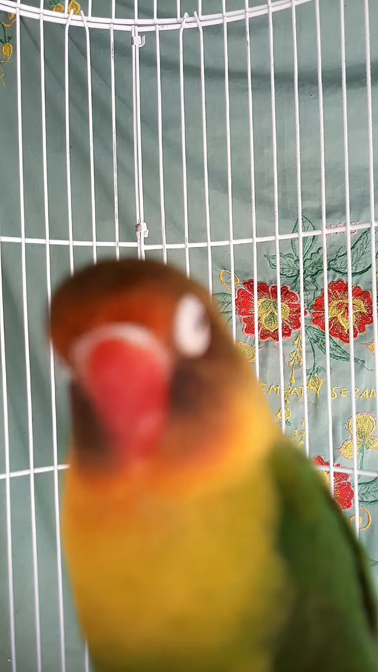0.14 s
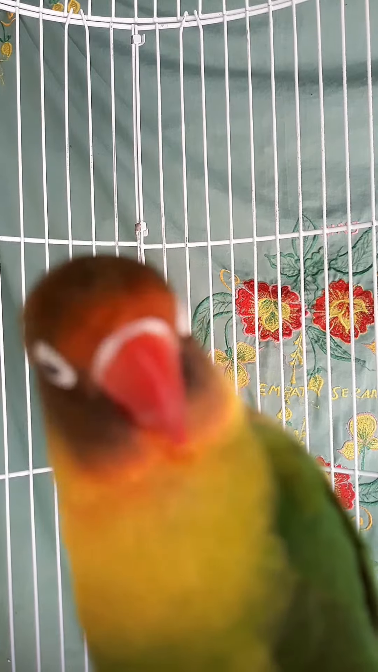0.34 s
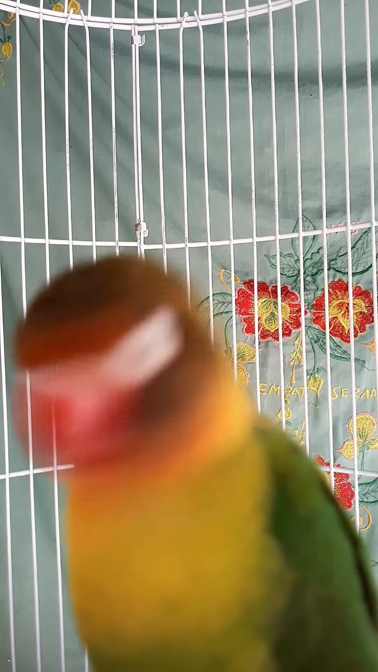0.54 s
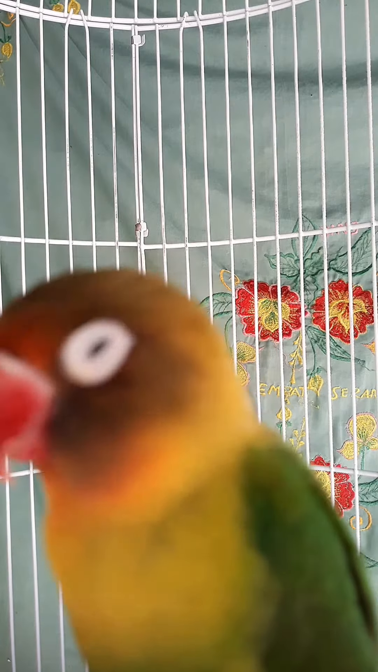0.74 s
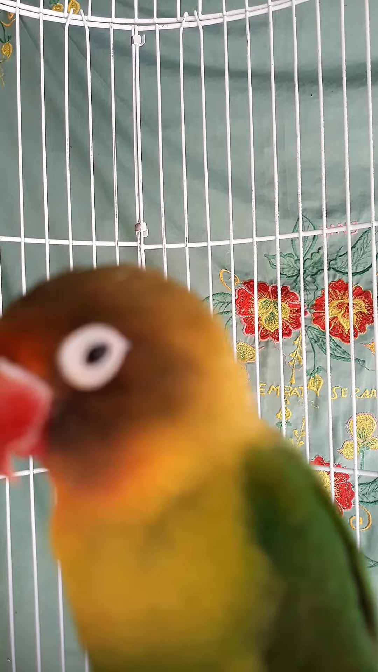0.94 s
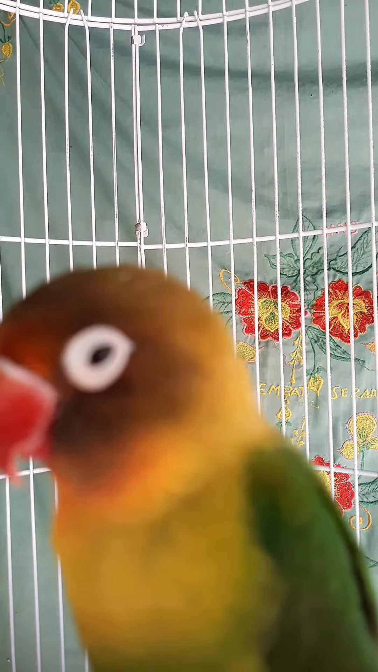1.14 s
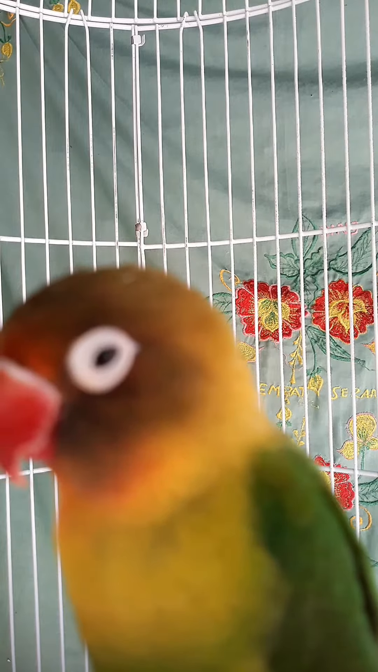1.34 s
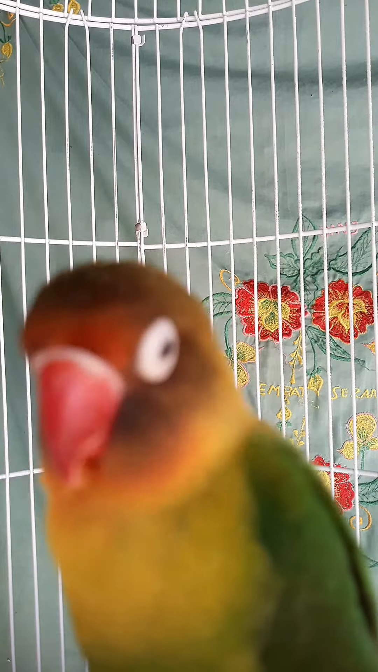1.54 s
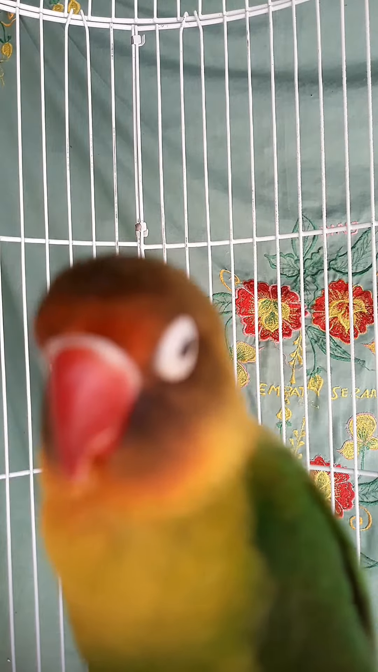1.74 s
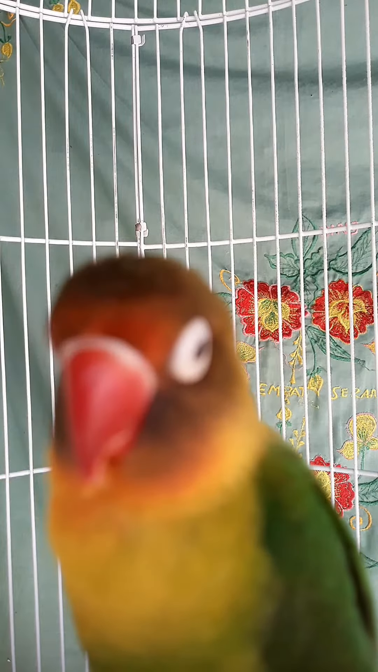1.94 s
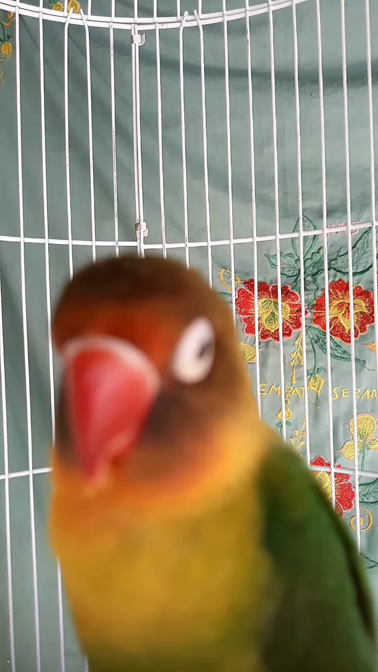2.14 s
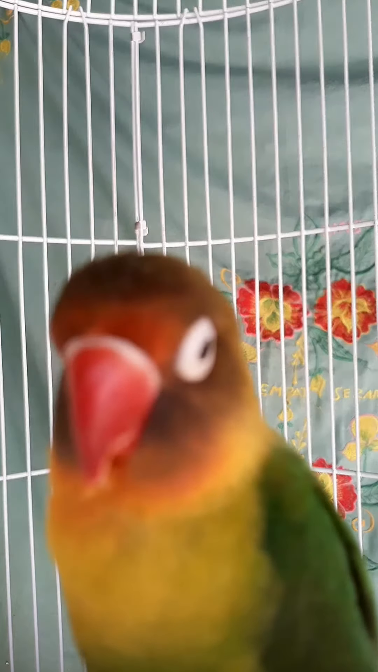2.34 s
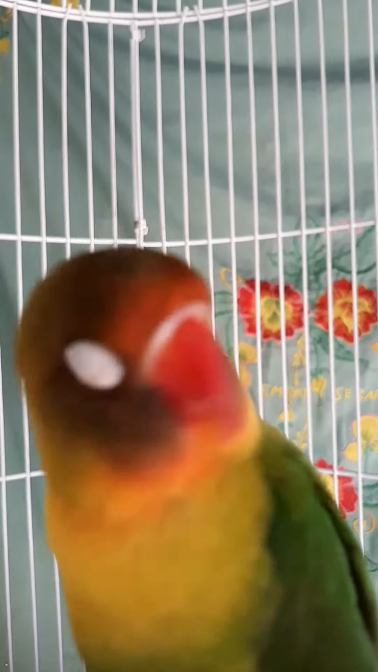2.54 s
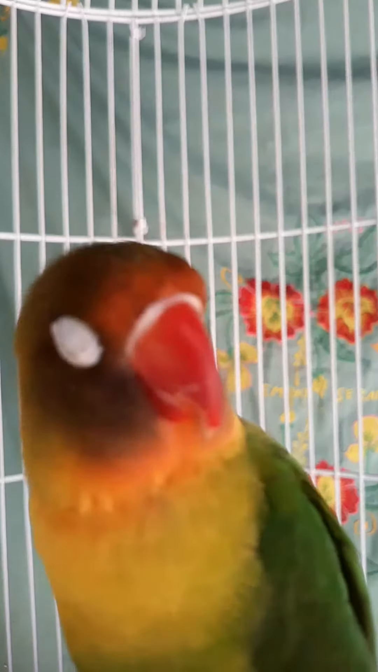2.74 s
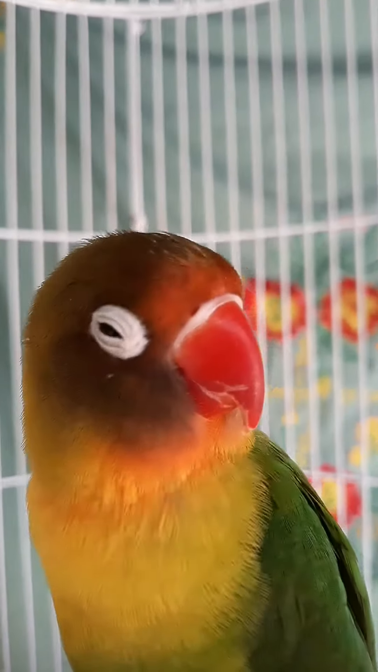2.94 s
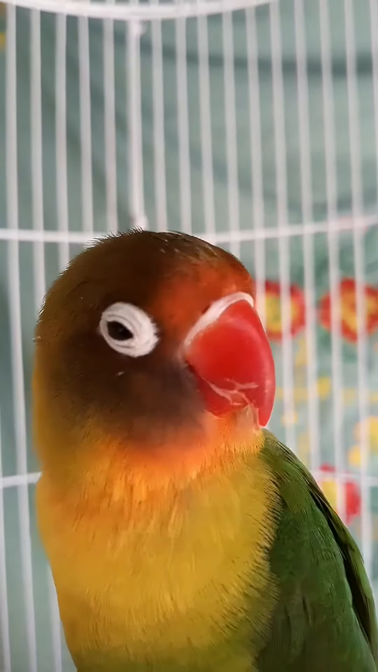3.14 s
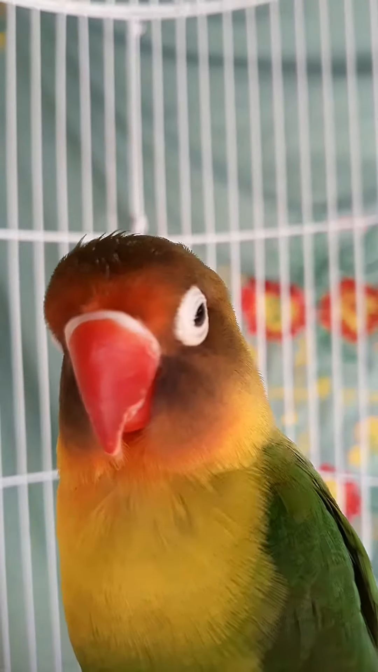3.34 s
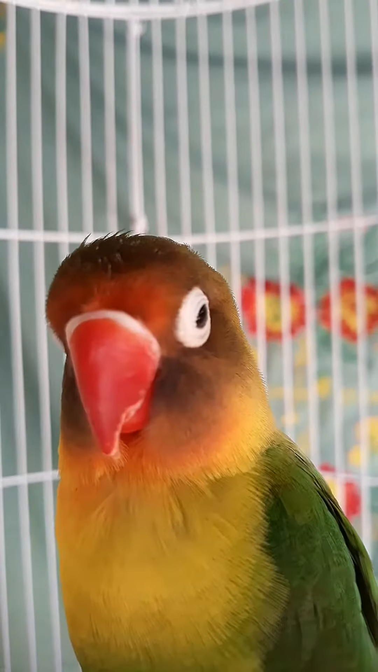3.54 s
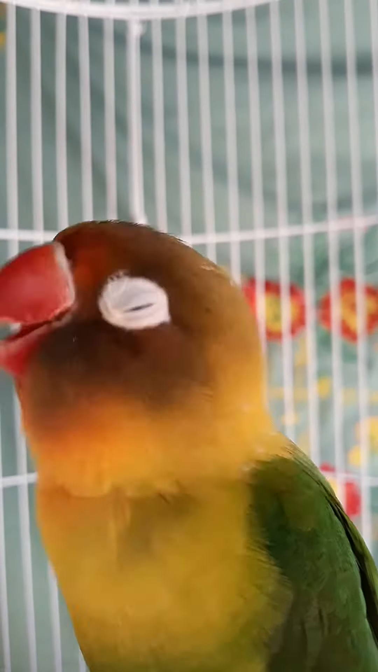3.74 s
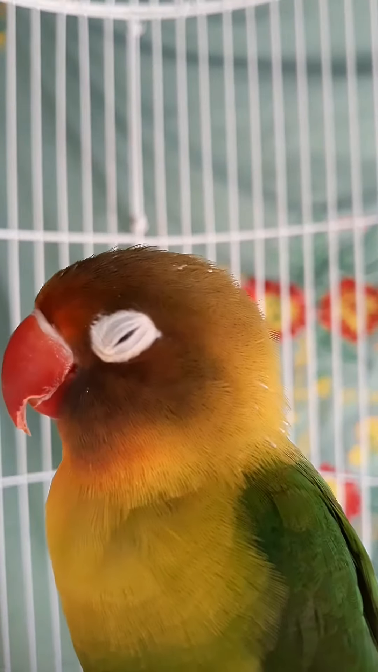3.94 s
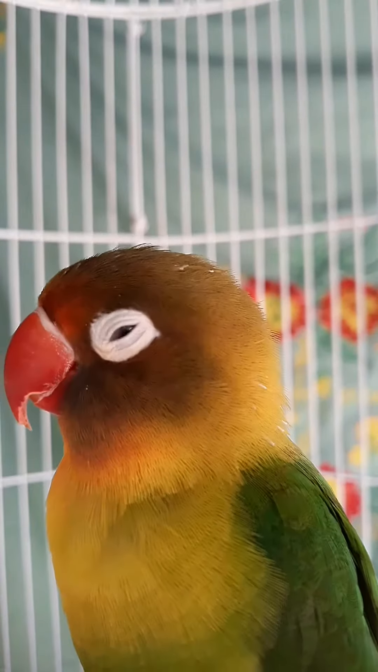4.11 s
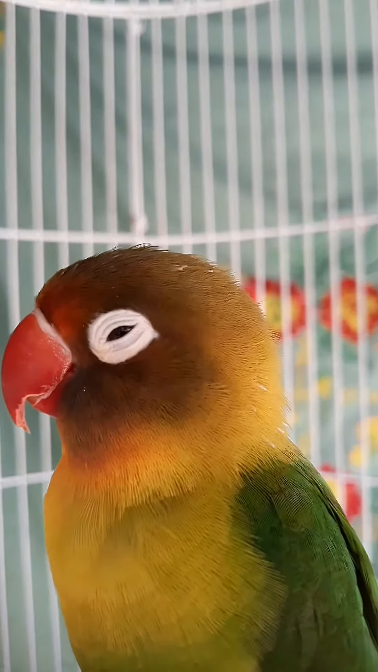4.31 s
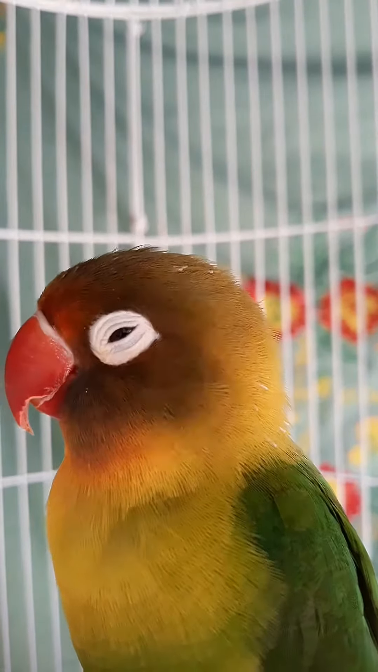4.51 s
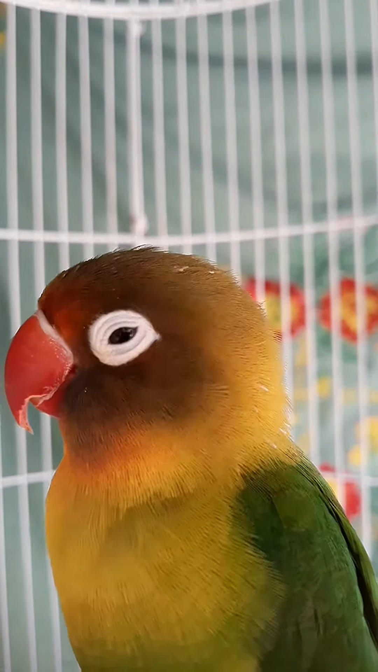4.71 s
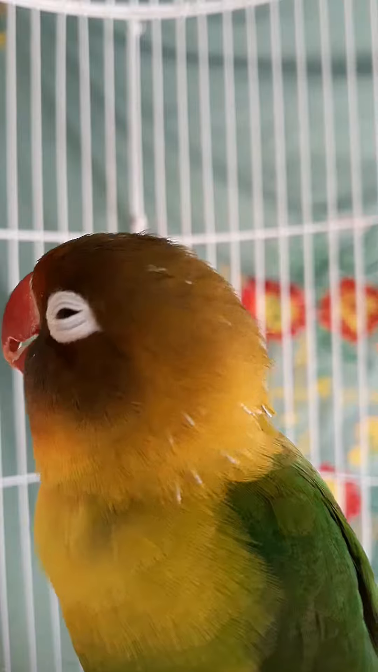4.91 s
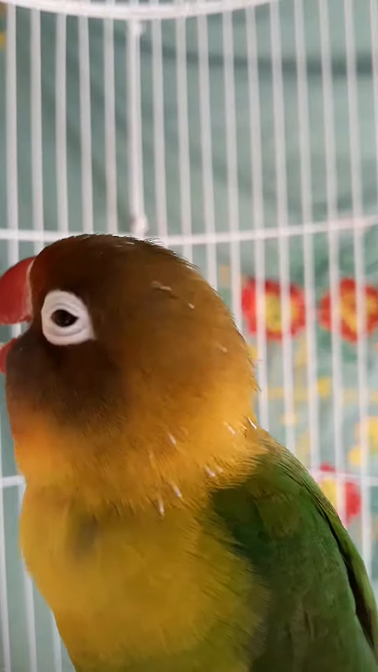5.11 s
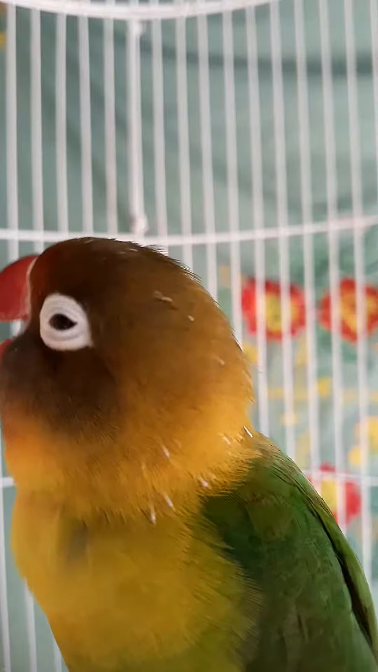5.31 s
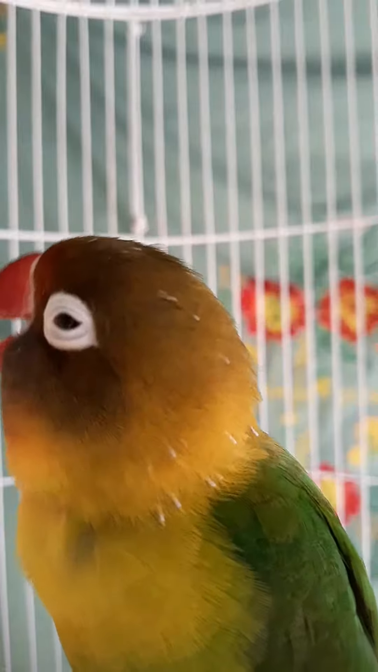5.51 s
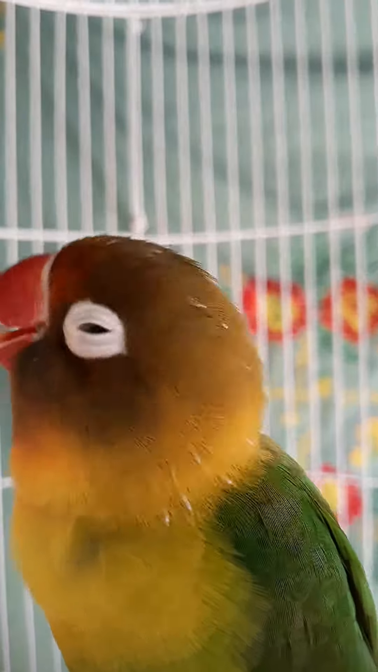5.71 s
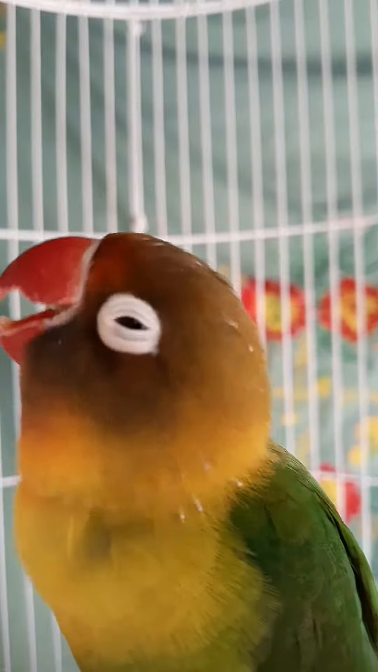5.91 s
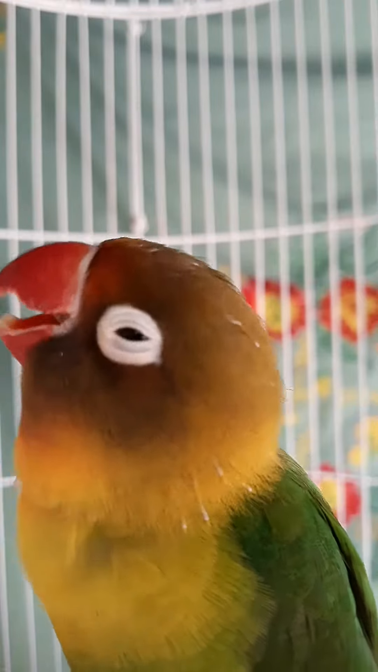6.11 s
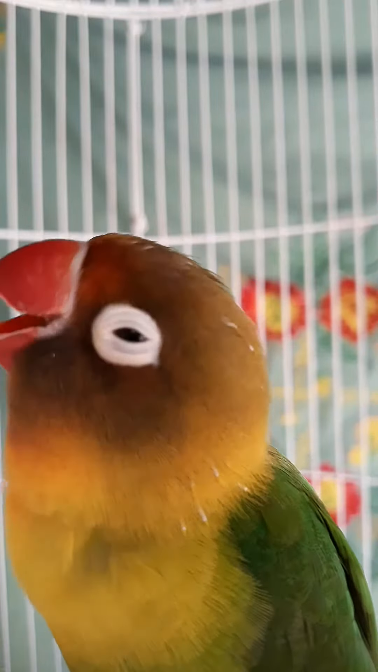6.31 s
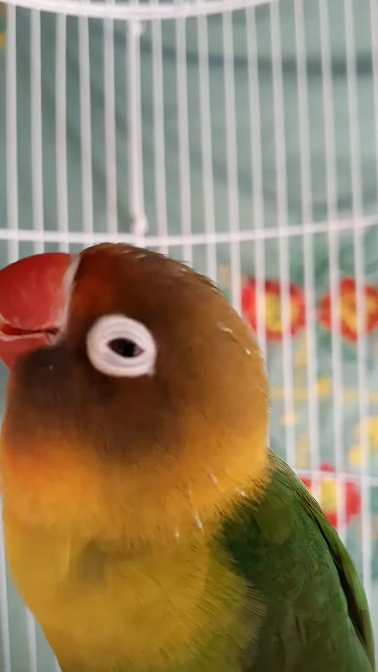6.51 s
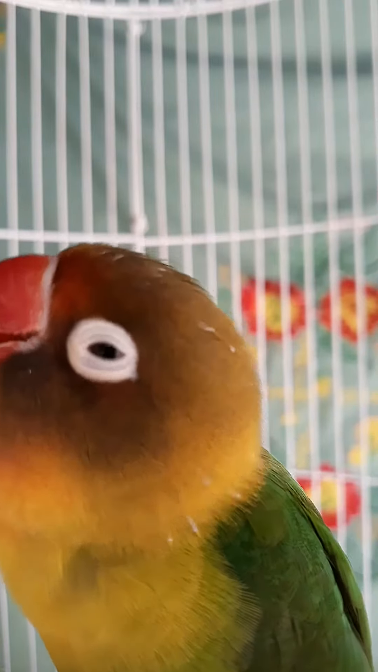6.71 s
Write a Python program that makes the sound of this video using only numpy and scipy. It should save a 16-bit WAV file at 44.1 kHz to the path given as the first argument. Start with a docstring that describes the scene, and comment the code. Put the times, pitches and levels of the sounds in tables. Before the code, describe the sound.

A lovebird in a wire cage, very close to the microphone, gives four piercing whistled chirps about a second apart, with faint feather rustles between them. It then squawks into a loud, fast rattling trill of ticks and reedy note pairs, which ends abruptly on another squawk. The calls ring briefly in a small room and slightly overload the microphone. A distant bird, faint insects and a low hum lie behind.

```python
"""A lovebird in a wire cage, very close, gives four piercing chirps and then a fast rattling trill of
ticks and note pairs. Its syrinx is the source and its throat the filter: the chirps are near-pure
whistles that open with a rasp, the trill notes are reedy harmonic stacks. The voice rings briefly in
the cage and a small room and overloads the microphone. Behind it lie rustling feathers, a far bird,
insects, soft bumps, a faint ring and a low hum."""
import sys
import numpy as np
from scipy import signal
from scipy.fft import rfft, irfft
from scipy.io import wavfile

SR = 44100
rng = np.random.default_rng(int(sys.argv[2]) if len(sys.argv) > 2 else 0)


def materialize(psi):
    """Save the field psi as 16-bit PCM at rate SR to the path in sys.argv[1].

    A 1-D psi becomes a single channel; in a 2-D psi each row is a channel.
    """
    bounded = np.clip(np.atleast_2d(psi).T, -1, 1)
    quanta = np.round(bounded * 32767).astype(np.int16)
    wavfile.write(sys.argv[1], SR, quanta)


N = 302526
TIME = np.arange(N) / SR
PROGRESS = np.linspace(0, 1, 13)   # from the start of a note to its end
# resonance curve of throat and beak: f/Hz, relative level/dB
THROAT = [(1400, -13), (2000, -17.5), (2700, -13), (3500, -2.5), (4400, -5), (5900, -6.5), (7000, -16.5),
          (8200, -11), (9800, -31.5), (11500, -25), (12800, -13), (14000, -30), (16500, -54)]


def lovebird():
    """Source and filter: whistled chirps and a thin pip, then the reedy squawks and trill."""
    # rasps that break into whistles: t/s, start f/Hz, rasp length/s, roughness 0-1, rasp level/dB,
    # whistle length/s, lowest f/Hz, top f/Hz, whistle level/dB (both levels relative)
    chirps = [(0.6584, 6540, 0.0082, 0.87, -8, 0.05, 5690, 6640, 4.5),
              (1.6278, 4390, 0.011, 0.33, -5, 0.031, 5820, 6450, 3.5),
              (2.622, 6040, .009, 0.28, 0.5, .048, 5878, 6426, 3),
              (3.7721, 4120, 0.0083, 0.6, 1.5, 0.044, 5457, 6590, 4.5)]
    # squawks that open and close the trill, a list each: t/s, f/Hz, relative level/dB, rasp 0-1
    squawks = [
        [(4.8538, 2550, -0.5, 1), (4.862, 2483, -8, 1), (4.8645, 5300, 2, 0.1), (4.868, 6800, -13.5, 0.34),
         (4.872, 6280, 3.5, 0.2), (4.878, 2346, -10.5, 0.4), (4.881, 2298, 1, 0), (4.896, 2047, -7, 0.37),
         (4.898, 2040, -16, .2)],
        [(6.7712, 2000, 1.5, 0), (6.775, 2253, -2, 0), (6.780, 1712, -2, 0), (6.7815, 3146, -13, .2),
         (6.787, 2363, 1, 0.1), (6.799, 2900, -2.5, 0), (6.809, 2792, -1, 0), (6.812, 2760, -26, .5)],
    ]
    pip = note(4.9257, length=0.0073, pitch=5020 * (1 + 0.12 * PROGRESS), db=-2 - 9.5 * PROGRESS ** .5)
    ticks, upbeats, downbeats = trill_contours()
    return (sing([chirp_contour(*row) for row in chirps] + [pip], whistle_voice, gain_db=0.5, snap_db=-5)
            + sing(squawks, reedy_voice, gain_db=1, snap_db=-38, tilt_db=1)
            + sing(ticks, reedy_voice, gain_db=-0.5, snap_db=5.5, tilt_db=2, jitter=0.036)
            + sing(upbeats, reedy_voice, gain_db=5, snap_db=-5, tilt_db=-3)
            + sing(downbeats, reedy_voice, gain_db=7.5, snap_db=-0.5, tilt_db=0, jitter=0.025))


def chirp_contour(s, start_hz, rasp_s, roughness, rasp_db, whistle_s, low_hz, top_hz, whistle_db):
    """Frequency glide: a rasp scoops up and clears into a whistle that dips, then climbs as it fades."""
    rasp_hz, scoop_s, break_s, dip_s = 6516, .0022, 0.00089, 0.0043
    clear_s = s + rasp_s + break_s
    opening = [(s, start_hz, rasp_db, roughness), (s + scoop_s, rasp_hz, rasp_db, roughness),
               (s + rasp_s, rasp_hz, rasp_db - 10, roughness), (clear_s, rasp_hz, whistle_db, 0)]
    climb = top_hz - (top_hz - low_hz) * (1 - PROGRESS) ** 2
    whistle = note(clear_s + dip_s, whistle_s - dip_s, climb, whistle_db - 10.5 * PROGRESS ** 2)
    return np.vstack([opening, whistle])


def trill_contours(settle_s=.0042):
    """Frequency glides: ticks and upbeats rise by a power law, downbeats relax to a steady pitch."""
    # hard upward flicks: t/s, length/s, start f/Hz, rise as a share of the pitch, relative level/dB
    tick_notes = [(4.9893, 0.0032, 1726, 0.41, 3), (5.0492, 0.0048, 2263, 0.63, 2),
                  (5.111, 0.0044, 1816, 0.33, 1.5), (5.176, 0.0038, 1804, 0.76, 3),
                  (5.239, 0.0032, 2170, 0.49, 2), (5.3045, 0.0052, 2230, 0.41, 4),
                  (5.3698, 0.0079, 2110, .14, 4), (5.4356, .006, 2010, 0.63, 3.5),
                  (5.5076, 0.0051, 1956, 0.59, 3), (6.6843, 0.0022, 1770, 0.27, 2)]
    # soft rising notes, first of each pair: columns as for the ticks
    upbeat_notes = [(5.629, 0.0086, 1644, 0.52, -9.5), (5.7088, 0.006, 1590, 0.54, -9),
                    (5.7846, 0.0035, 1550, 0.33, -9.5), (5.8567, 0.01, 1672, 0.5, -6.5),
                    (5.9315, 0.0076, 1620, 0.49, -5.5), (6.0067, 0.0093, 1651, 0.27, -6.5),
                    (6.0903, 0.0056, 1537, 0.5, -11.5), (6.1673, 0.0066, 1716, 0.22, -7.5),
                    (6.2464, 0.0085, 1757, 0.22, -5.5), (6.3235, 0.0064, 1770.0, 0.33, -6.5),
                    (6.4018, 0.0057, 1576, 0.42, -7.5), (6.4836, 0.0082, 1560, 0.63, -8),
                    (6.5736, 0.0056, 1640, 0.44, -7), (6.6618, 0.0031, 1510, 0.46, -18),
                    (6.7437, 0.0011, 1910, 0.045, -15)]
    # loud notes, second of each pair: t/s, length/s, start f/Hz, settled f/Hz, relative level/dB
    downbeat_notes = [(5.581, 0.016, 2372, 2156, -6), (5.6578, 0.014, 2037, 2073, -8),
                      (5.7361, 0.013, 2300.0, 2287, -5.5), (5.81, 0.018, 3054, 1940.0, -6),
                      (5.8843, 0.019, 2346, 2033, -6), (5.9594, 0.015, 2880, 1954, -6),
                      (6.0314, 0.023, 2620, 2064, -7.5), (6.1163, 0.021, 2445, 2037, -8.5),
                      (6.196, 0.013, 2157, 1933, -5.5), (6.274, 0.015, 2326, 1918, -6.5),
                      (6.3501, 0.023, 2430.0, 1987, -5), (6.427, 0.022, 2297, 2007, -7.0),
                      (6.5129, 0.022, 2400, 2078, -6), (6.6025, 0.017, 2960, 1806, -6.5),
                      (6.689, 0.027, 3067, 1937, -7.5)]
    u = PROGRESS
    ticks = [note(s, length, hz * (1 + rise * u ** 1.5), db - 5 * u ** 2, rasp=0.11)
             for s, length, hz, rise, db in tick_notes]
    upbeats = [note(s, length, hz * (1 + rise * u ** 2.38), db - 5.5 * (2 * u - 1) ** 2, rasp=0.099)
               for s, length, hz, rise, db in upbeat_notes]
    downbeats = []
    for s, length, start_hz, rest_hz, db in downbeat_notes:
        pitch = rest_hz + (start_hz - rest_hz) * np.exp(-(length * u / settle_s) ** 1.51)
        downbeats.append(note(s, length, pitch, db - 15 * u ** 2.94, rasp=0.067))
    return ticks, upbeats, downbeats


def note(s, length, pitch, db, rasp=0, release_s=0.00081, release_db=5.5):
    """A contour ending in a quick decay; its columns are t/s, f/Hz, relative level/dB, rasp 0-1."""
    contour = np.column_stack(np.broadcast_arrays(s + length * PROGRESS, pitch, db, rasp))
    return np.vstack([contour, contour[-1] + [release_s, 0, -release_db, 0]])


def gesture(contour, edge_s=0.00037):
    """Linear interpolation gives a call's pitch, gated amplitude and rasp at every sample."""
    s, pitch, db, rasp = np.transpose(contour)
    t = np.arange(s[0], max(s[-1], s[0] + .001), 1 / SR)
    gate = np.clip(np.minimum(t - t[0], t[-1] - t) / edge_s, 0, 1)
    return np.interp(t, s, pitch), gate * from_db(np.interp(t, s, db)), np.interp(t, s, rasp)


def sing(contours, voice, gain_db, snap_db, **colour):
    """Superposition: each call is a voiced tone plus an onset click that follows its opening level."""
    out = np.zeros(N)
    for contour in contours:
        s, _, db, _ = contour[0]
        add(out, s, voice(contour, **colour))
        add(out, s, from_db(db + snap_db) * membrane_click())
    return from_db(gain_db) * out


def whistle_voice(contour, second_hz=2400, jitter=.004, rasp_jitter=0.092):
    """Amplitude modulation: during the rasp a second, slower vibration gives the whistle sidebands."""
    pitch, envelope, rasp = gesture(contour)
    n, rasp = len(pitch), np.where(rasp > .1, rasp, 0)
    phase = phase_of(pitch * (1 + (jitter + rasp_jitter * rasp) * drift(2500, n)))
    second = np.sin(phase_of(second_hz * (1 + 0.013 * drift(1000, n))))
    # the octave swells as it climbs into the throat's top resonance
    octave = from_db(-13 + at_hz(THROAT, 2 * pitch) - at_hz(THROAT, 12700) + 2 * drift(270, n))
    whistle = np.sin(phase) + (1 - .7 * rasp) * octave * np.sin(2 * phase)
    rattle = band(rasp * second * (1.03 * np.sin(phase) + from_db(-11)), 2300, 5500)
    return envelope * (whistle + rattle)


def reedy_voice(contour, tilt_db, jitter=0.023, shimmer=0.11):
    """Throat resonances filter the syrinx's harmonics, tilted by tilt_db per octave; breath adds hiss."""
    # the neck stretches through the trill, so the resonances sink and the top dulls after a brief rise:
    # t/s, resonance scale, relative level above 10 kHz/dB
    neck = [(4.85, 1.008, -4), (5.5, 1.068, -1), (5.649, 1.033, 2), (5.998, 0.98, -7.5), (6.7, 0.96, -7.5),
            (6.86, 1, 1)]
    times, scales, tops_db = np.transpose(neck)
    scale, top_db = np.interp(contour[0][0], times, scales), np.interp(contour[0][0], times, tops_db)
    pitch, envelope, rasp = gesture(contour)
    n, k = len(pitch), np.arange(1, 9)[:, None]
    hz = k * pitch
    phase = phase_of(pitch * (1 + jitter * drift(1987, n)))
    throat_db = at_hz(THROAT, hz / scale) + top_db * (hz > 10000)
    contrast = 1.5 - rasp * (k <= 3)   # rasp lets the weak low harmonics through
    gains = from_db(throat_db * contrast + tilt_db * np.log2(k)) * (hz < SR / 2)
    voice = np.sum(gains * np.sin(k * phase), axis=0) / np.linalg.norm(gains, axis=0)
    hiss = from_db(-26 + top_db) * band(rng.standard_normal(n), 3500, 13000)
    return envelope * (voice * (1 + shimmer * drift(1800, n)) + hiss)


def membrane_click(n=600, decay_s=0.00029):
    """A brief transient has a broad spectrum: the membranes snap open with a puff."""
    return from_db(-9) * band(rng.standard_normal(n), 1300, 9000) * np.exp(-TIME[:n] / decay_s)


def early_echoes(x):
    """Comb filtering: cage and cloth return weaker copies a few milliseconds late."""
    # the echoes' travel times: t/s
    delays = [.00236, .00295, .00347]
    # their strengths against the direct sound: level/dB
    levels = [-15, -22, -16]
    return sum(from_db(db) * np.interp(TIME - s, TIME, x, left=0) for s, db in zip(delays, levels))


def reverberation(x, t60_s, delay_s, band_hz):
    """Convolution with exponentially decaying noise makes dense echoes, at unit gain in their band."""
    t = TIME[:SR // 2]
    response = rng.standard_normal(len(t)) * from_db(-60 * t / t60_s) * (t > delay_s)
    return signal.fftconvolve(x, band(response / np.linalg.norm(response), *band_hz))[:N]


def feathers():
    """Friction noise: feathers give short crinkly swishes as the bird turns."""
    # swishes: t/s, length/s, level/dB
    rustles = [(0.317, 0.057, -53), (1.936, 0.042, -67), (3.166, 0.21, -54), (3.543, 0.11, -56),
               (4.151, .1, -51.5)]
    out = np.zeros(N)
    for s, length, db in rustles:
        crinkle = rng.standard_normal(SR) * from_db(2 * drift(262, SR))
        add(out, s, swell(band(crinkle, 2550, 6400), length, db))
    return out


def far_bird(spread=0.02, waver=.024):
    """Frequency modulation: thin whistles waver down one shared slide, swelling near their middle."""
    # whistles, the short ones broken off early: t/s, length/s, relative level/dB
    whistles = [(.01, 0.15, -52.5), (0.417, 0.22, -47.5), (0.825, 0.21, -49.5), (1.21, 0.15, -51.5),
                (2.329, 0.21, -47.5), (2.725, 0.19, -48.5), (3.042, .11, -53), (3.47, 0.22, -43.5),
                (3.853, 0.21, -39), (4.39, 0.077, -57.5)]
    # their falling pitch: t/s from the onset, f/Hz
    slide = [(0, 4090), (.045, 3860), (.09, 3293), (.14, 2976), (.185, 2620), (.22, 2364)]
    out = np.zeros(N)
    for s, length, db in whistles:
        n = int(length * SR)
        pitch = np.interp(TIME[:n], *np.transpose(slide)) * (1 + spread * rng.uniform(-1, 1))
        phase = phase_of(pitch * (1 + waver * drift(45, n) + 0.0066 * drift(530, n)))
        swell_db = np.linspace(-3, 0, n) + 4 * np.sin(np.linspace(0, np.pi, n))
        envelope = from_db(db + swell_db + 4 * drift(60, n)) * signal.windows.tukey(n, .15)
        add(out, s, envelope * (np.sin(phase) + from_db(-15) * np.sin(2 * phase)))
    return out


def insects(sag_per_s=0.062, flicker_db=3):
    """Harmonic tones: two insects repeat a note that sags in pitch while each partial flickers."""
    # one insect a row: first note t/s, period/s, length/s, start f/Hz
    singers = [(.1, 0.658, .6, 3197), (0.334, 0.944, .5, 3058)]
    out = np.zeros(N)
    for first_s, period, length, hz in singers:
        n = int(length * SR)
        for s in np.arange(first_s, TIME[-1], period):
            phase = phase_of(hz * (1 - sag_per_s * TIME[:n] + 0.0016 * drift(450, n)))
            tone = sum(from_db(db + flicker_db * drift(32, n)) * np.sin(k * phase)
                       for k, db in ((1, -60), (2, -58), (4, -58)))
            add(out, s, signal.windows.tukey(n, .6) * tone)
    return out


def bumps(edge_ratio=1.4):
    """Band-limited noise in dull swells is heard as soft bumps and far-off sounds."""
    # swells: t/s, length/s, centre f/Hz, level/dB
    events = [(1.314, 0.097, 214, -44), (1.546, 0.099, 252, -33.5), (2.03, .15, 167.4, -38.5),
              (2.018, 0.35, 643, -48.5), (2.747, .15, 750, -44.5), (3.184, 0.22, 566, -50),
              (3.842, 0.065, 990, -42.5), (3.855, 0.093, 680, -40.5), (3.96, .12, 770, -47.5),
              (4.58, 0.18, 156, -50.5), (4.97, 0.13, 820, -48)]
    out = np.zeros(N)
    for s, length, hz, db in events:
        noise = band(rng.standard_normal(SR), hz / edge_ratio, hz * edge_ratio)
        add(out, s, swell(noise, length, db))
    return out


def faint_ring():
    """Free decay: four damped modes die away from the start."""
    # modes: f/Hz, starting level/dB, t60/s
    modes = [(1503, -54.5, 3.3), (1190, -66, 6), (1141, -62.5, 2), (736, -64.5, 2.8)]
    return sum(from_db(db - 60 * TIME / t60) * np.sin(2 * np.pi * hz * TIME) for hz, db, t60 in modes)


def room_tone(air_db=-48.5):
    """Superposition of broadband air noise, a wavering hum and the narrowband hiss of farther insects."""
    # spectral density of the air noise: f/Hz, relative level/dB
    air_spectrum = [(18, -67.5), (30, -52.5), (66, -1.5), (121, -2.5), (245, -12.5), (512, -19.5),
                    (1040, -26.5), (1500, -27.5), (2120, -35.5), (3060, -26.5), (5310, -28), (6210, -23.5),
                    (10500, -46.5), (12300, -39), (16000, -56)]
    # the hum's two tones: f/Hz
    hum_tones = [88.5, 123.4]
    # their slow course: t/s, lower tone level/dB, upper tone level/dB
    hum_course = [(0, -46, -60.5), (1.399, -48.5, -53.5), (2, -50.5, -46.5), (4, -62, -51),
                  (4.9, -54, -47.5), (6.86, -83, -56)]
    hz = np.fft.rfftfreq(N, 1 / SR)
    air = irfft(rfft(rng.standard_normal(N)) * from_db(at_hz(air_spectrum, hz)), N)
    out = from_db(air_db + drift(3.8, N)) * air / air.std()
    times, *levels = np.transpose(hum_course)
    for hum_hz, db in zip(hum_tones, levels):
        envelope = from_db(np.interp(TIME, times, db)) * (1 + .5 * drift(7, N))
        out += envelope * np.sin(2 * np.pi * hum_hz * TIME + 1.3 * drift(9.2, N))
    for centre_hz, db in ((12500, -65), (3200, -62)):
        hiss = band(rng.standard_normal(N), centre_hz * .96, centre_hz * 1.04)
        out += from_db(db) * hiss / hiss.std()
    return out


def from_db(db):
    """Amplitude ratio of a level in decibels."""
    return 10 ** (np.asarray(db) / 20)


def at_hz(spectrum, hz):
    """Interpolation of a spectrum on a log-frequency axis."""
    f, db = np.transpose(spectrum)
    return np.interp(np.log(np.maximum(hz, 1)), np.log(f), db)


def phase_of(hz):
    """Phase is the running integral of frequency."""
    return 2 * np.pi * np.cumsum(hz) / SR


def band(x, low_hz, high_hz):
    """Band-pass filter with second-order slopes."""
    return signal.sosfilt(signal.butter(2, [low_hz, high_hz], "band", fs=SR, output="sos"), x)


def drift(rate_hz, n):
    """Interpolated noise: a random wander of spread about 1."""
    knots = rng.standard_normal(2000)
    return np.interp(np.arange(n) * rate_hz / SR, np.arange(len(knots)), knots)


def swell(noise, length, db):
    """A half-sine envelope brings noise up to an rms level of db and back."""
    n = int(length * SR)
    return from_db(db) * noise[:n] / noise.std() * np.sin(np.linspace(0, np.pi, n))


def add(out, s, sound):
    """Superpose a sound at time s."""
    at = round(s * SR)
    out[at:at + len(sound)] += sound[:max(N - at, 0)]


def scene(close_db=2.5):
    """The direct-to-reverberant ratio falls with distance: the near bird is dry, the far one wetter."""
    bird, far = lovebird(), far_bird()
    cage = from_db(-11) * reverberation(bird, t60_s=0.052, delay_s=0.0038, band_hz=(3000, 15000))
    room = from_db(-20.5) * reverberation(bird, t60_s=0.27, delay_s=0.016, band_hz=(1400, 10000))
    far_room = from_db(-2) * reverberation(far, t60_s=0.27, delay_s=0.002, band_hz=(1500, 12000))
    near = from_db(close_db) * (bird + early_echoes(bird) + cage + room) + feathers()
    background = from_db(-6) * far + far_room + insects() + bumps() + faint_ring() + room_tone()
    return (near + background)[None]


def record(dry, ceiling_db=.5, attack_s=.0015, release_db_per_s=45, low_cut_hz=45, stop_hz=16300):
    """Overload: a limiter ducks at loud calls, what outruns it clips, and rumble and top are cut."""
    over_db = np.maximum(20 * np.log10(np.abs(dry[0]) + 1e-9) - ceiling_db, 0)
    held_db = np.maximum.accumulate(over_db + release_db_per_s * TIME) - release_db_per_s * TIME
    pole = np.exp(-1 / (attack_s * SR))
    limited = dry * from_db(-signal.lfilter([1 - pole], [1, -pole], held_db))
    oversampled = signal.resample_poly(limited, 4, 1, axis=1)   # keeps aliasing low
    clipped = signal.resample_poly(np.clip(oversampled, -.84, .84), 1, 4, axis=1)
    thinned = signal.sosfilt(signal.butter(2, low_cut_hz, "high", fs=SR, output="sos"), clipped)
    return signal.sosfilt(signal.cheby2(14, 60, stop_hz, fs=SR, output="sos"), thinned)


dry = scene()
out = record(dry)
materialize(out)
```